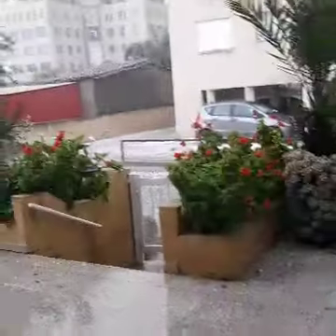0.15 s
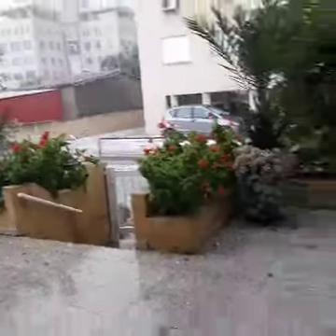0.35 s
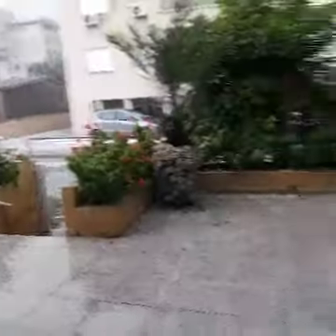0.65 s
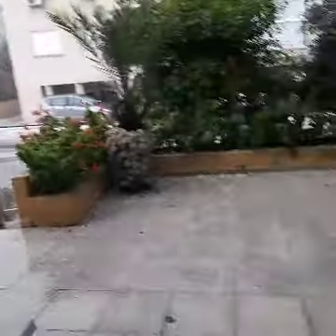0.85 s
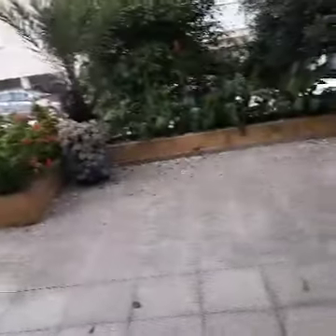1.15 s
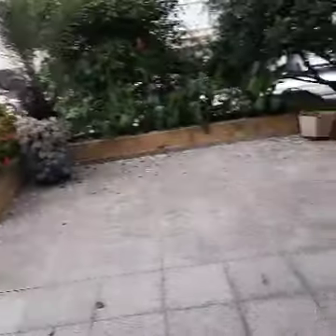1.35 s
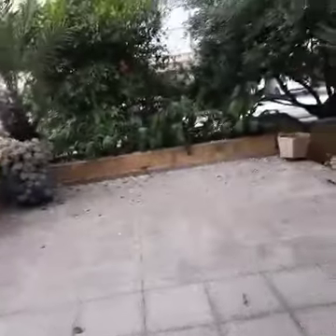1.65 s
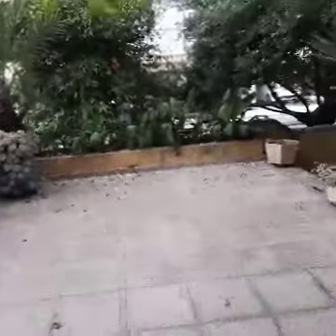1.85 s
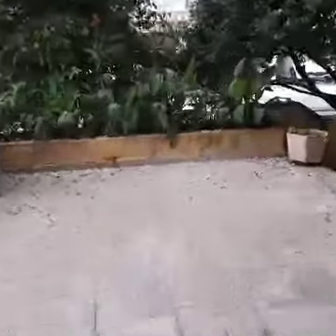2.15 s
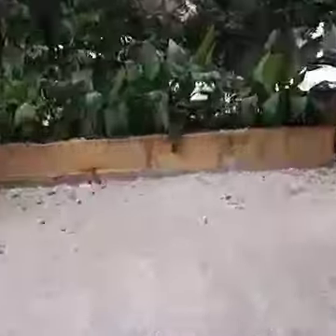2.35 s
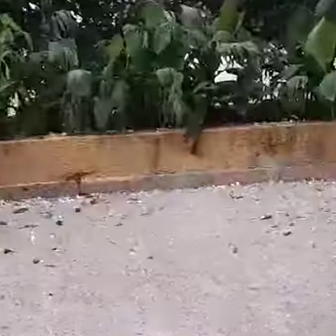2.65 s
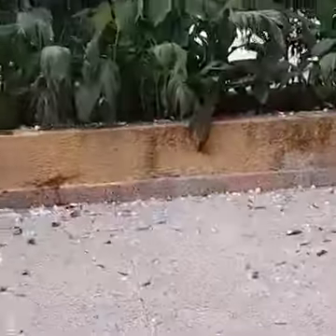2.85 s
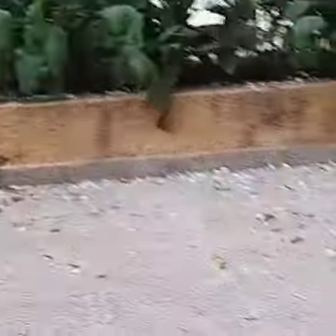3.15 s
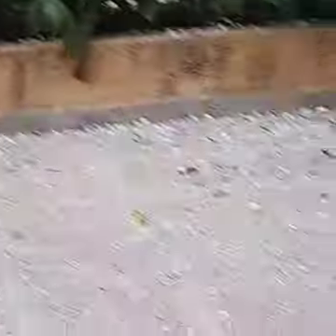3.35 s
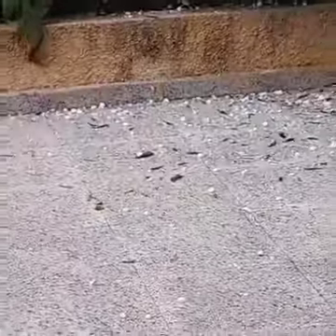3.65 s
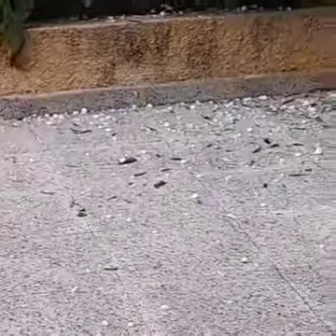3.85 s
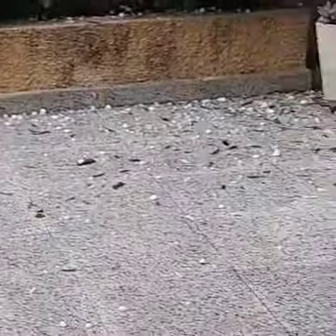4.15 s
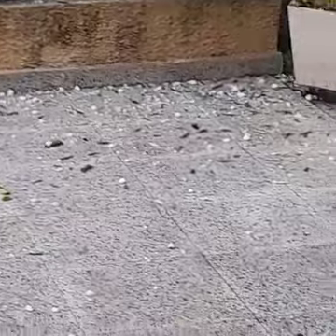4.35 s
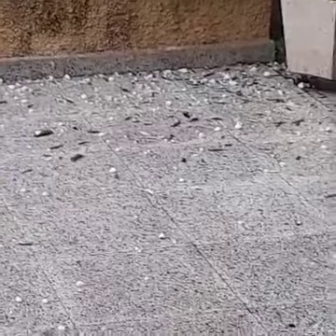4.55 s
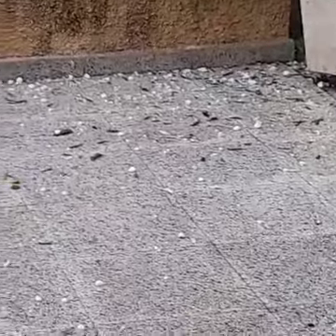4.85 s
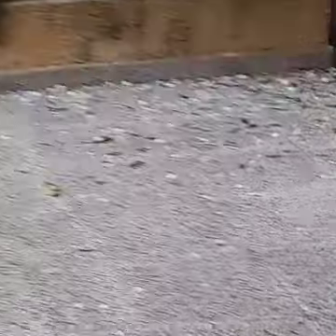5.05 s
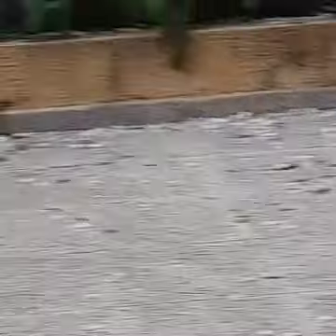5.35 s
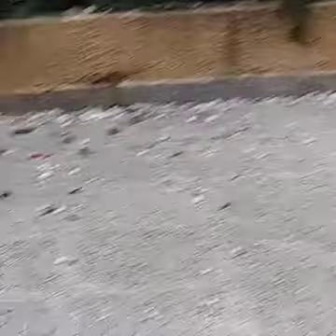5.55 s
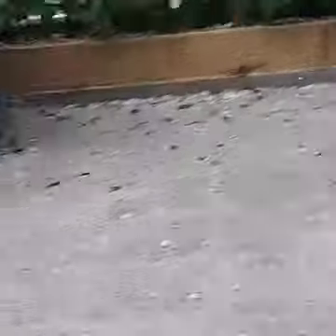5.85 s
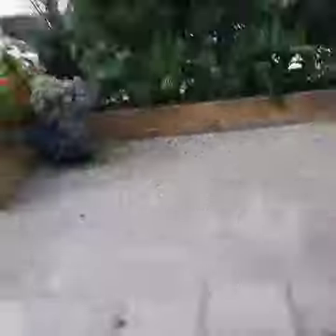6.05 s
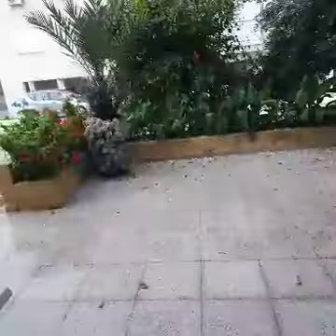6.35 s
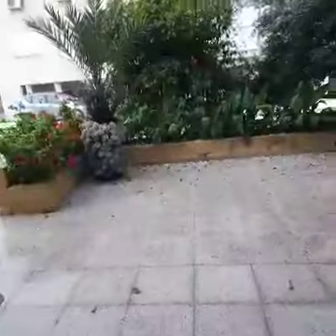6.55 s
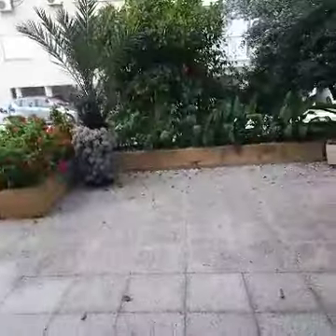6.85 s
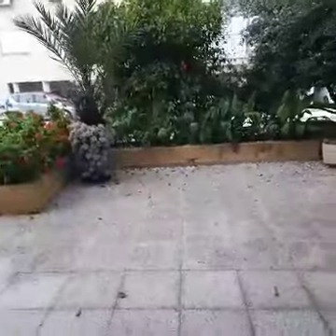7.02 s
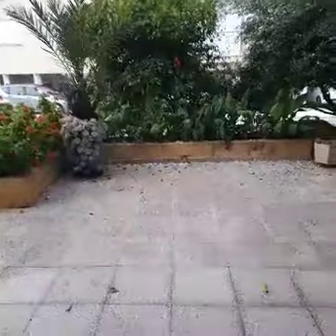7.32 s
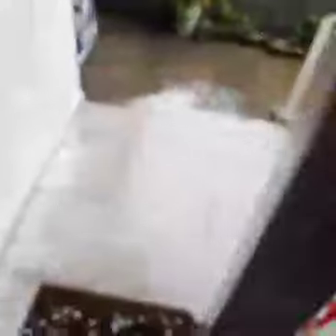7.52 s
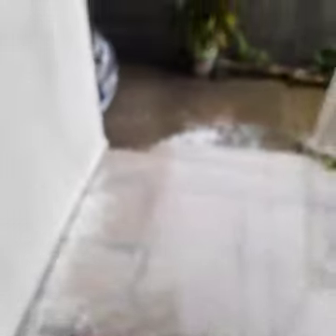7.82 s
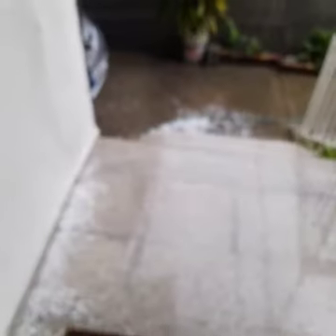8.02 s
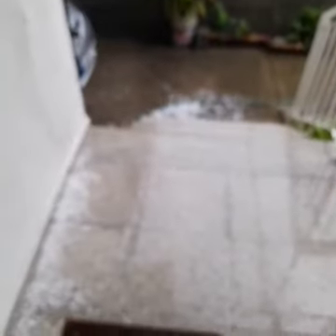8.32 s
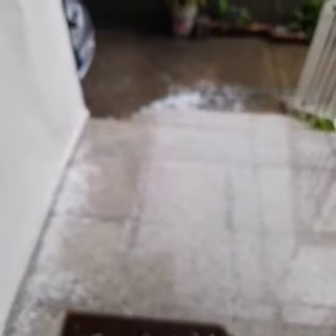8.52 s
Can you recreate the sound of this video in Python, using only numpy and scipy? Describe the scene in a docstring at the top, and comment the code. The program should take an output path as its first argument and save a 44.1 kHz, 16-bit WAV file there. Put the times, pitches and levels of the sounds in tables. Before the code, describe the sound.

A hailstorm rattles on a walled, paved yard: a continuous dense patter with dry clicks, sharp cracks scattering ice, knocking pots and short metallic pings, over low roof drumming. A faint far engine climbs in pitch and fades around six and a half seconds. After a very brief silence near 7.5 seconds, a sheltered passage is much quieter, mostly muffled rumble with thin splatter. Handheld stereo microphone amid the storm.

```python
"""A walled, paved yard in a hailstorm: random clicks, filtered and given wall echoes, form the patter.
Big stones are a filtered click and a burst of noise; pings and knocks are decaying tones, blurred or pure.
Roofs add low-passed rumble and booming sines, a far engine a climbing sine, a street a hollow patter.
After a short silence a sheltered side passage follows: mostly drumming, with sparse splatter."""
import sys
import numpy as np
from scipy import signal
from scipy.fft import rfft, irfft
from scipy.io import wavfile
from scipy.ndimage import uniform_filter1d

SR = 44100
rng = np.random.default_rng(int(sys.argv[2]) if len(sys.argv) > 2 else 0)


def wrap_up_sound(samples):
    """Save the sound to the file named by the first command line argument, as 16-bit audio."""
    columns = np.atleast_2d(samples).T
    # keep every value between -1 and 1, then stretch to whole-number steps
    tamed = np.clip(columns, -1, 1)
    steps = np.round(tamed * 32767).astype(np.int16)
    wavfile.write(sys.argv[1], SR, steps)


N = 382788
TIME = np.arange(N) / SR
YARD_END_S, PASSAGE_START_S = 7.394, 7.561
CUTOFF_HZ = 15600

# far engine: level/dB is the centre of its wavering; frequency is given at the loudest moment
ENGINE_LOUDEST_S, ENGINE_DB, ENGINE_RISE_DB_PER_S, ENGINE_FADE_DB_PER_S = 6.52, -30, 10.5, 58
ENGINE_HZ, ENGINE_CLIMB_HZ_PER_S = 72.9, 11

# hail on the street, heard through the gate: relative spectrum [f/Hz, density/dB per Hz]
STREET_SPECTRUM = [(300, -25.5), (620, -1), (720, -2.5), (800, 3.5), (900, 0.5), (1080, -16), (1320, 1.5),
                   (1520, -7), (1730, 0.5), (2250, -6), (2550, -5.5), (3000, -10), (4100, -12.5),
                   (9000, -30.5)]
STREET_START_DB, STREET_FADE_S = -29, 1.28

# drumming on the roofs around the yard [t/s, level/dB]
YARD_DRUM_LEVEL = [(0, -32), (.7, -28.5), (1.6, -29.5), (2.2, -29.5), (3.0, -29.5), (3.7, -32),
                   (4.4, -30.5), (4.9, -31.5), (7.3, -31.5)]
# relative spectra of the drumming [f/Hz, density/dB per Hz]
YARD_DRUM_SPECTRUM = [(20, -22.5), (42, -19), (54, -4.5), (68, -1), (110, 0), (190, -5.5), (260, -8),
                      (320, -5.5), (400, -10.5), (500, -16.5), (900, -23), (2500, -71)]
PASSAGE_DRUM_SPECTRUM = [(20, -27.5), (40, -17), (60, 4.5), (85, -5), (120, 2.5), (200, -5.5), (290, -3),
                         (370, -10), (480, -16), (700, -26), (2000, -61)]
# dull booms of roof sheets [t/s, f/Hz, peak level/dB, time to fall 60 dB/s]
ROOF_BOOMS = [(.53, 73.4, -27, 0.66), (.75, 81.3, -29, 0.82), (1.845, 113, -21, 0.2),
              (2.07, 76.6, -26, 0.93), (2.11, 140, -25.5, .15), (2.205, 112, -22, 0.15),
              (2.53, 77, -27.5, 0.93), (2.60, 102, -26, 0.44), (2.92, 102, -24.5, .4),
              (3.02, 71, -23.5, 0.35), (4.43, 150, -23, 0.19), (8.145, 116, -21.5, 0.15)]
BOOM_RISE_SHARE = .09   # swelling time as a share of the ring time

# modes of railings and gate [f/Hz, width/Hz, relative level/dB]
RAILING_MODES = [(1670, 380, -7.5), (2427, 61, -2), (4140, 160, -9), (5620, 90, -15), (6720, 70, -20)]
# stones on railings, pots and planters
# [t/s, f/Hz, width/Hz, level/dB before the tone and blur gains, time to fall 60 dB/s]
STRUCK_OBJECTS = [ (.30, 6770, 90, -41, .4), (.51, 2670, 160, -37, .3), (.66, 2490, 100, -33.5, 0.45),
                  (.79, 5740, 220, -40, .3), (.84, 2440, 110, -31, 0.51), (1.071, 1810, 140, -35, .3),
                  (1.17, 2450, 140, -32, .4), (1.19, 5780, 101, -32.5, 0.27), (1.47, 2710, 140, -31, 0.33),
                  (2.10, 950, 100, -33, .35), (2.21, 6770, 140, -40.5, .4), (2.299, 5460, 1100, -25, 0.27),
                  (2.301, 2125, 230, -23.5, 0.44), (2.38, 6930, 350, -33.5, 0.25),
                  (2.66, 1510, 200, -31, 0.42), (3.50, 1680, 130, -39.5, 0.27),
                  (3.61, 1680, 130, -38, 0.26), (3.65, 6800, 200, -35, 0.35), (3.73, 1560, 130, -29, 0.24),
                  (3.90, 1810, 120, -28, 0.27), (4.10, 1680, 130, -37, 0.34), (4.18, 3680, 130, -31, .3),
                  (4.194, 1250, 90, -29.5, 0.28), (4.441, 1720, 120, -34, .3),
                  (4.535, 1520, 190, -24.5, 0.33), (4.61, 6800, 160, -40, .5), (4.671, 6780, 130, -32, .42),
                  (4.67, 2410, 70, -37, .8), (4.82, 1510, 110, -30, .35), (5.03, 1420, 90, -34, .5),
                  (5.09, 1260, 130, -32, .25), (5.128, 2530, 200, -24, .25), (5.158, 2670, 260, -30, 0.26),
                  (5.49, 6880, 150, -39, .35), (5.51, 2420, 90, -36, .5), (5.58, 1600, 130, -34, .3),
                  (5.64, 2450, 100, -37, .45), (5.73, 2540, 130, -33, .35), (5.83, 1550, 120, -31, .3),
                  (6.30, 1680, 140, -28, .33), (6.42, 1680, 130, -32.5, .3), (6.554, 2600, 280, -32, 0.24),
                  (6.875, 6950, 380, -32, .25), (6.90, 6810, 170, -33, .3), (6.94, 2410, 90, -42, .5),
                  (7.336, 2740, 420, -22, 0.23), (7.628, 1990, 300, -39.5, .36),
                  (7.841, 1050, 450, -39, .33), (7.849, 2190, 600, -42, .28), (7.90, 1200, 110, -52, 0.31),
                  (7.90, 2760, 130, -52, .3), (8.12, 2150, 140, -47, .3), (8.44, 2490, 140, -44, .5),
                  (8.455, 3450, 100, -50, .55)]
# a tone inside a blur of close modes: beyond the clear width, a wider blur weakens the tone
PING_TONE_DB, PING_BLUR_DB, PING_CLEAR_WIDTH_HZ, PING_ATTACK_S = -2.5, -3, 99, .003

# shower in the yard, before constant trims [t/s, patter level/dB, bright patter level/dB]
YARD_SHOWER_LEVEL = [(0.0, -38, -36), (0.12, -35, -38.5), (1.08, -30.5, -36.5), (1.53, -31.5, -35.5),
                     (1.82, -29, -38), (2.36, -30, -35.5), (2.71, -31.5, -36.5), (5.67, -31, -38),
                     (7.16, -33, -40), (7.2, -31, -41)]
# relative spectra of the patter [f/Hz, density/dB per Hz]
YARD_PATTER_SPECTRUM = [(150, -19), (400, 1), (520, 1), (780, 4), (1000, 2.5), (1320, 1), (1600, 2),
                        (1850, -1), (2280, -4), (2600, -6), (3800, -9), (5000, -12.5), (7200, -15),
                        (8200, -21.5), (10000, -22), (12300, -19.5), (15500, -27.5)]
PASSAGE_PATTER_SPECTRUM = [(200, -18), (550, 1), (900, 1), (1600, -2.5), (2400, -3.5), (4000, -8),
                           (7000, -9), (8800, -14.5), (12500, -10), (15500, -16)]
# balance of the two sides in the yard [f/Hz, left over right level/dB]
YARD_SIDE_BALANCE = [(60, -3), (130, 0), (290, -3.5), (640, 1), (1410, -3), (3100, 1), (6820, -0.5),
                     (15000, 2.5)]
# how much later the sound reaches the right side
YARD_LAG_S, PASSAGE_LAG_S = .00011, .00038
# mean levels in the passage, whose splatter comes unevenly
PASSAGE_PATTER_DB, PASSAGE_BRIGHT_DB, PASSAGE_DRUM_DB = -46.5, -51, -32.5
PASSAGE_BRIGHT_WANDER_DB = 2
# flurries that swell and die away in the passage [t/s, swell level/dB]
PASSAGE_FLURRIES = [(7.615, 4), (7.83, 3.5), (8.432, 7)]
FLURRY_RISE_S, FLURRY_DECAY_S = .018, .17

# big stones; the level precedes the ice colouring
# [t/s, scatter level/dB, low edge f/Hz, distance/m, left over right level/dB]
BIG_STONES = [ (0.181, -30, 3500, 3, 2), (.432, -33, 8920, 5, 2), (.512, -27.5, 4000, 5.2, 0),
              (.859, -25, 3500, 3.4, 2.5), (1.402, -19, 10400, 1.5, 4), (1.481, -25, 4250, 7.6, 1),
              (1.923, -33, 3500, 1.5, -5), (1.965, -32.5, 3000, 13, 0.5), (2.108, -37, 3000, 0.54, 4),
              (2.210, -31, 5000, 5, -1), (2.299, -24.5, 900, 2.2, 4), (2.432, -32, 2500, 2, 2),
              (2.524, -40, 1100, 2.5, 1), (2.650, -32, 5500, 6, 1), (2.785, -33, 5500, 2.5, 3),
              (2.940, -41, 4000, 1.3, 1), (3.020, -21, 1000, 1.5, 2.5), (3.068, -30, 2500, 7.7, -1),
              (3.222, -27, 4500, 2.5, -1.5), (3.400, -28.5, 3000, 5.1, 0), (3.811, -23, 2000, 0.82, 1.5),
              (3.821, -25, 2000, 1.6, -2), (3.886, -24, 1500, 3.8, 0.5), (3.907, -29, 1500, 2, -6),
              (3.980, -27, 2500, 1, 2), (4.188, -29, 3180, 1.3, 0), (4.490, -28, 3000, 1.5, 3),
              (4.533, -25, 1200, 2, 5), (4.729, -21, 1100, 1.8, 1), (4.942, -29, 2500, 3, -1),
              (4.98, -24.5, 4230, 1.1, -1), (5.136, -29, 2300, 0.76, 3), (5.151, -27.5, 2480, 3.3, -1),
              (5.497, -32, 2500, 5.9, -1), (5.678, -33, 3500, .7, -3), (5.747, -29.5, 1600, 5.2, 0),
              (5.829, -26.5, 2000, 3.4, 2), (5.931, -22.5, 1800, 3.7, 1), (5.951, -27, 1000, 2.9, -2),
              (6.060, -34, 9500, 2, 0), (6.302, -24.5, 3000, 1.1, 3), (6.315, -29, 1500, 3, -1),
              (6.430, -24.5, 3000, 2.1, 0), (6.498, -28.5, 4000, 4, 0), (6.808, -33, 4000, 3.5, 0),
              (7.108, -29, 3050, 6, 1), (7.204, -31.5, 3500, 1.5, 0), (7.615, -44, 6000, 1, 9),
              (7.724, -39, 5040, 5.7, 2), (7.761, -36.5, 5000, 2.8, 2), (7.845, -44, 1500, 6.2, 2),
              (7.959, -38, 5000, 0.9, 1), (8.070, -45, 4000, 2, 0), (8.192, -43, 4000, 2, 0),
              (8.281, -40, 5000, 3, 3), (8.342, -36, 8500, 1.9, 4), (8.361, -39, 5500, 0.76, 4),
              (8.571, -40, 5000, 0.83, 5)]
# shattering ice: relative colouring [f/Hz, gain/dB]
ICE_SPECTRUM = [(1000, -2.5), (2000, 7), (3600, 3.5), (5000, 0), (7000, -0.5), (8500, -9), (12500, -5),
                (15500, -10)]
# the farther the stone, the weaker its crack and the slower and duller its scatter
CRACK_DB = 15   # crack peak over the scatter at 1 m, before the ice colouring
SCATTER_RISE_S_PER_M, SCATTER_DECAY_S = .00089, .016   # decay at 1 m
SCATTER_TOP_HZ, DULLING_M = 17100, 9.3   # top edge at no distance; distance that halves it
# a broad resonance of each stone, centred above its low edge
BODY_ABOVE_HZ, BODY_WIDTH_HZ, BODY_DB = 1650, 1040, -6.5


def from_db(db):
    """Logarithmic level: decibels become an amplitude ratio."""
    return 10 ** (np.asarray(db) / 20)


def rms_one(x):
    """Effective value: the signal is scaled to rms 1."""
    return x / np.sqrt(np.mean(x ** 2) + 1e-20)


def in_time(rows):
    """Linear interpolation: each column of a curve is read at every sample."""
    s, *columns = np.transpose(rows)
    return [np.interp(TIME, s, c) for c in columns]


def drift(rate):
    """Slow fluctuation: random knots, rate per second, joined by lines and scaled to rms 1."""
    knots = rng.standard_normal(int(N / SR * rate) + 2)
    return rms_one(np.interp(TIME * rate, np.arange(len(knots)), knots))


def band(x, low_hz, high_hz):
    """Band limitation: a causal band-pass."""
    high_hz = min(high_hz, .45 * SR)
    low_hz = min(low_hz, high_hz - 20)
    return signal.sosfilt(signal.butter(2, [low_hz, high_hz], "band", fs=SR, output="sos"), x)


def colour(x, spectrum, size=8192):
    """Minimum phase: folding the cepstrum gives a causal filter with the wanted spectrum."""
    hz, db = np.transpose(spectrum)
    grid = np.maximum(np.arange(size // 2 + 1) * SR / size, 1)
    cepstrum = irfft(np.log(from_db(np.interp(np.log(grid), np.log(hz), db))))
    cepstrum[1:size // 2] *= 2
    cepstrum[size // 2 + 1:] = 0
    response = irfft(np.exp(rfft(cepstrum)))
    return signal.oaconvolve(x, response[None], axes=1)[:, :N]


def impacts(per_s, spread_db, limit):
    """Random arrivals: clicks of either sign, many weak and a few strong."""
    at = np.flatnonzero(rng.random(N) < per_s / SR)
    strength_db = spread_db * np.minimum(rng.exponential(1, len(at)), limit)
    out = np.zeros(N)
    out[at] = from_db(strength_db) * rng.choice([-1, 1], len(at))
    return out


def shower(per_s, spread_db, limit, count=9):
    """Directional hearing: stones from each direction have their own lag and balance of the sides."""
    out = np.zeros((2, N))
    for side in np.linspace(-1, 1, count):
        clicks = impacts(per_s / count, spread_db, limit)
        lag = int(side * SR * .00021)
        out += from_db([[2 * side], [-2 * side]]) * [np.roll(clicks, -lag), np.roll(clicks, lag)]
    return rms_one(out)


def walls(x, t60, wet_db):
    """Diffuse reverberation: impact energy decays as noise, independent on each side."""
    keep = from_db(-120 / (t60 * SR))   # energy factor per sample
    energy = signal.lfilter([1 - keep], [1, -keep], np.mean(x ** 2, axis=0) + 1e-18)
    return x + from_db(wet_db) * np.sqrt(energy) * rng.standard_normal((2, N))


def share_long_waves(x, apart_hz):
    """Wavelength and spacing: long waves reach both sides alike; only short ones differ."""
    high_pass = signal.butter(1, apart_hz, "high", fs=SR, output="sos")
    side = signal.sosfilt(high_pass, (x[0] - x[1]) / 2)
    return x.mean(axis=0) + side * [[1], [-1]]


def right_later(x, lag_s):
    """Travel time: sound from the left reaches the right side a moment later."""
    return np.array([x[0], np.roll(x[1], round(lag_s * SR))])


def engine():
    """Periodic firing: a far engine's note climbs steadily, wavers, grows and then quickly fades."""
    t = TIME - ENGINE_LOUDEST_S
    hz = ENGINE_HZ + ENGINE_CLIMB_HZ_PER_S * t
    db = ENGINE_DB + np.minimum(ENGINE_RISE_DB_PER_S * t, -ENGINE_FADE_DB_PER_S * t)
    amplitude = np.sqrt(2) * from_db(db + 1.6 * drift(14))
    phase = 2 * np.pi * np.cumsum(hz + 3.35 * drift(16)) / SR
    return amplitude * np.sin(phase)


def street():
    """Distant reverberation: a hollow street patter fades as the listener turns to the garden."""
    gain = from_db(STREET_START_DB) * np.exp(-(TIME / STREET_FADE_S) ** 2)
    far = walls(shower(per_s=3000, spread_db=6.5, limit=2.3, count=3), t60=.28, wet_db=11)
    return gain * rms_one(colour(share_long_waves(far, apart_hz=750), STREET_SPECTRUM))


def drumming(spectrum, level_db, side_db):
    """Superposition: dull roof blows merge into a rumble whose longest waves reach both sides alike."""
    mid = impacts(per_s=1500, spread_db=2.5, limit=3.0)
    apart = rng.standard_normal(N)
    side = from_db(side_db) * (apart + 2.8 * band(apart, 330, 3000))
    return from_db(level_db) * rms_one(colour(rms_one(mid) + side * [[1], [-1]], spectrum))


def thuds():
    """Damped resonance of sheets: the longer a roof booms, the more slowly it swells."""
    out, t = np.zeros(N + SR), TIME[:SR * 2 // 3]
    for s, hz, db, t60 in ROOF_BOOMS:
        at, rise = int(s * SR), BOOM_RISE_SHARE * t60
        envelope = np.minimum(t / rise, 1) * from_db(db - 60 * np.maximum(t - rise, 0) / t60)
        out[at:at + len(t)] += envelope * np.sin(2 * np.pi * hz * t)
    return out[:N]


def railing(bright_db):
    """Resonance under random taps: small stones keep each railing mode singing in fits of its own."""
    modes = 0
    for hz, width, db in RAILING_MODES:
        taps = shower(per_s=200, spread_db=2.5, limit=2.5, count=2) * from_db(2.5 * drift(9))
        modes = modes + from_db(db) * rms_one(band(taps, hz - width / 2, hz + width / 2))
    return from_db(bright_db - 8.5) * modes


def pings():
    """Modal ringing: struck metal and pottery give a tone in a cluster of modes, blurred by the walls."""
    out, t = np.zeros((2, N + SR)), TIME[:SR // 2]
    for s, hz, width_hz, db, t60 in STRUCK_OBJECTS:
        noise = rng.standard_normal((2, len(t)))
        cluster = rms_one(band(noise, hz - width_hz / 2, hz + width_hz / 2))
        clarity = min(1, PING_CLEAR_WIDTH_HZ / width_hz)
        phase = np.pi * rng.random((2, 1))
        tone = clarity * np.sqrt(2) * np.sin(2 * np.pi * hz * t + phase)
        envelope = np.minimum(t / PING_ATTACK_S, 1) * from_db(db - 60 * t / t60)
        ring = from_db(PING_TONE_DB) * tone + from_db(PING_BLUR_DB) * cluster
        at = int(s * SR)
        out[:, at:at + len(t)] += envelope * ring
    return out[:, :N]


def knocks(per_s, low_hz, high_hz, t60):
    """Free vibration: a knocked pot or planter gives a decaying tone at a pitch of its own."""
    out, t = np.zeros((2, N + SR)), TIME[:SR // 4]
    for when, pitch, strength, angle in rng.random((int(per_s * N / SR), 4)):
        hz, at = low_hz * (high_hz / low_hz) ** pitch, int(when * N)
        ring = np.sin(2 * np.pi * hz * t + angle * np.array([[1], [-1]]))
        out[:, at:at + len(t)] += (.5 + strength) * from_db(-60 * t / t60) * ring
    return rms_one(out[:, :N])


def ticks(per_s, shortest_s, longest_s):
    """Frequency-dependent damping: stones on slabs, leaves and pots click or tink, high pitches briefest."""
    out, t = np.zeros((2, N + SR)), TIME[:SR // 16]
    for when, pitch, length, angle, strength in rng.random((int(per_s * N / SR), 5)):
        hz = 1100 * 13 ** pitch
        # the length range is that of low pitches; damping shortens high ones
        t60 = shortest_s * (longest_s / shortest_s) ** length / (1 + (hz / 5000) ** 2)
        decay = np.exp(-np.log(1000) * t / t60)
        weight = np.sqrt(hz / t60) * (.5 + strength)   # offsets the smaller energy of short rings
        ring = np.sin(2 * np.pi * hz * t) * decay * weight
        at = int(when * N)
        out[0, at:at + len(t)] += np.cos(np.pi * angle) * ring
        out[1, at:at + len(t)] += np.sin(np.pi * angle) * ring
    return rms_one(out[:, :N])


def close_hits(per_s, low_hz, high_hz, snap_s, bounce_s, bounce_db):
    """Impact and rebound: a dry snap on a near slab, pitched by stone size, then one weaker bounce."""
    out, t = np.zeros((2, N + SR)), TIME[:SR // 50]
    for when, pitch, strength, angle, hop in rng.random((int(per_s * N / SR), 5)):
        hz = low_hz * (high_hz / low_hz) ** pitch
        burst = rng.standard_normal((2, len(t))) * np.exp(-t / snap_s)
        snap = rms_one(band(burst, hz / 1.53, hz * 1.54))
        snap = snap * np.sqrt(hz) * (.5 + strength ** 2) * np.sqrt([[angle], [1 - angle]])
        for delay, db in ((0, 0), (bounce_s * (.5 + hop), bounce_db)):
            at = int(when * N + delay * SR)
            out[:, at:at + len(t)] += from_db(db) * snap
    return rms_one(out[:, :N])


def patter(spectrum, body_db, bright_db, near_per_s, near_db, tick_db, close_db, flurry_db):
    """Superposition of impacts: a far wash, nearer stones with echoes, pitched ticks and dry close hits."""
    far = walls(shower(per_s=7000, spread_db=1.5, limit=4.0, count=5), t60=.14, wet_db=4.5)
    far = far * from_db(flurry_db * drift(22))
    near = walls(shower(near_per_s, spread_db=0.0, limit=2.7), t60=.24, wet_db=5.5)
    small = ticks(per_s=260, shortest_s=.015, longest_s=.18)
    close = close_hits(per_s=42, low_hz=1500, high_hz=9000, snap_s=.0012, bounce_s=.09, bounce_db=-7)
    mix = rms_one(far) + from_db(near_db) * rms_one(near)
    mix = mix + from_db(tick_db) * small + from_db(close_db) * close
    mix = colour(share_long_waves(mix, apart_hz=760), spectrum)
    # the body carries from far away; the bright part depends on what lies close
    body = signal.sosfilt(signal.butter(1, 3500, fs=SR, output="sos"), mix)
    body_gain = from_db(body_db) / np.std(band(mix, 500, 3000))
    bright_gain = from_db(bright_db) / np.std(band(mix, 4000, 15000))
    return body_gain * body + bright_gain * (mix - body)


def big_stones():
    """Fracture and scattering: a sharp crack, then fragments, bounces and echoes that swell and die."""
    out, t = np.zeros((2, N + SR)), TIME[:SR // 3]
    for s, db, low_hz, metres, pan_db in BIG_STONES:
        rise, decay = SCATTER_RISE_S_PER_M * metres, SCATTER_DECAY_S * np.sqrt(metres)
        high_hz = SCATTER_TOP_HZ / (1 + (metres / DULLING_M) ** 2)
        body_hz = low_hz + BODY_ABOVE_HZ

        def resonate(x):
            """Resonance: the stone's whole band plus its own broad peak."""
            body = band(x, body_hz - BODY_WIDTH_HZ / 2, body_hz + BODY_WIDTH_HZ / 2)
            return band(x, low_hz, high_hz) + from_db(BODY_DB) * body

        # fragments land in bunches
        clumps = rms_one(uniform_filter1d(rng.standard_normal(len(t)), size=60))
        grain_db = 1.4 * clumps + 2.3 * rng.standard_normal(len(t))
        spray = resonate(rng.standard_normal((2, len(t))) * from_db(grain_db))
        swell = np.minimum(t / rise, 1) * np.exp(-np.maximum(t - rise, 0) / decay)
        crack = resonate(signal.unit_impulse(len(t)))
        crack = from_db(CRACK_DB) / metres * crack / np.abs(crack).max()
        side_gain = from_db(db + pan_db / 2 * np.array([[1], [-1]]))
        at = int(s * SR)
        out[:, at:at + len(t)] += side_gain * (swell * rms_one(spray) + crack)
    return colour(out[:, :N], ICE_SPECTRUM)


def yard():
    """Superposition in the open: loud patter, pots, railings, drumming, engine and street add up."""
    body_db, bright_db = in_time(YARD_SHOWER_LEVEL)
    drum_db, = in_time(YARD_DRUM_LEVEL)
    hail = patter(YARD_PATTER_SPECTRUM, body_db + .2, bright_db + 4.5, near_per_s=350, near_db=-6.0,
                  tick_db=-11.0, close_db=-16, flurry_db=.98)
    pots = from_db(body_db - 10.5) * knocks(per_s=38, low_hz=680, high_hz=3200, t60=.14)
    roofs = drumming(YARD_DRUM_SPECTRUM, drum_db, side_db=-15.0)
    sides = hail + pots + roofs + engine() + railing(bright_db) + street()
    tinted = []
    for side, sign in zip(sides, (1, -1)):
        tint = [(hz, sign * db / 2) for hz, db in YARD_SIDE_BALANCE]
        tinted.append(colour(side[None], tint)[0])
    return right_later(tinted, YARD_LAG_S)


def passage():
    """Screening: walls hold off most of the patter, so drumming prevails and single flurries stand out."""
    swell_db = 0
    for s, db in PASSAGE_FLURRIES:
        rise = np.clip((TIME - s) / FLURRY_RISE_S, 0, 1)
        decay = np.exp(-np.maximum(TIME - s - FLURRY_RISE_S, 0) / FLURRY_DECAY_S)
        swell_db = swell_db + db * rise * decay
    bright_db = PASSAGE_BRIGHT_DB + PASSAGE_BRIGHT_WANDER_DB * drift(14)
    hail = patter(PASSAGE_PATTER_SPECTRUM, PASSAGE_PATTER_DB + swell_db, bright_db, near_per_s=170,
                  near_db=-3.5, tick_db=-11.0, close_db=-16, flurry_db=1.2)
    roofs = drumming(PASSAGE_DRUM_SPECTRUM, PASSAGE_DRUM_DB + .65 * drift(10), side_db=-17.0)
    return hail * from_db([[.9], [-.9]]) + right_later(roofs, PASSAGE_LAG_S)


def scene():
    """Succession of sound fields: first the yard, then a silent gap, then the passage."""
    in_yard, in_passage = TIME < YARD_END_S, TIME > PASSAGE_START_S
    single_blows = thuds() + pings() + big_stones()
    return yard() * in_yard + passage() * in_passage + single_blows * (in_yard | in_passage)


def record(dry):
    """Low-pass filtering: an elliptic filter cuts the top steeply."""
    return signal.sosfilt(signal.ellip(10, .2, 80, CUTOFF_HZ, fs=SR, output="sos"), dry)


dry = scene()
out = record(dry)
wrap_up_sound(out)
```